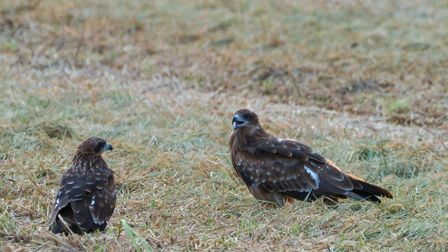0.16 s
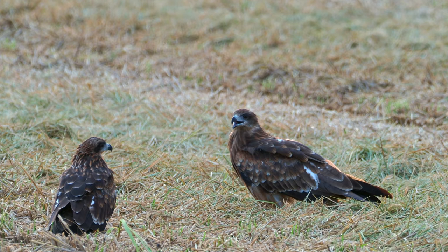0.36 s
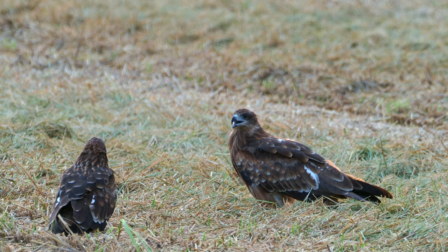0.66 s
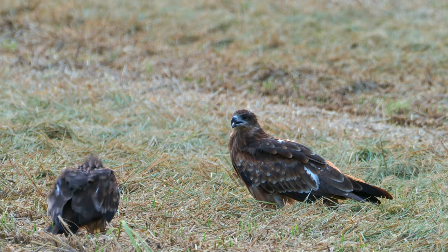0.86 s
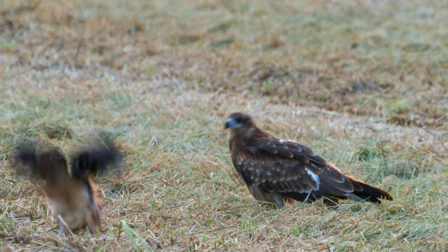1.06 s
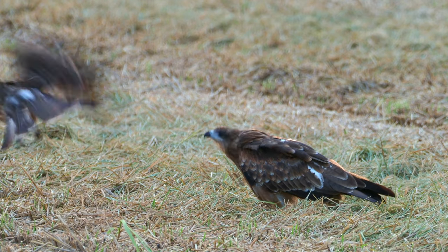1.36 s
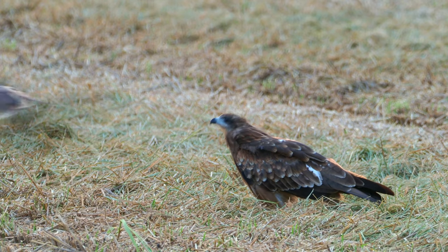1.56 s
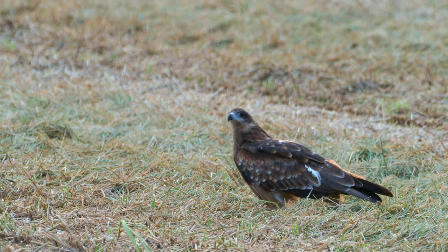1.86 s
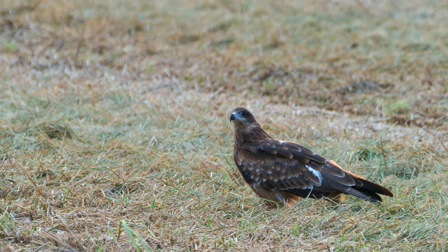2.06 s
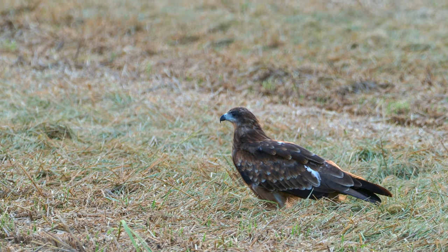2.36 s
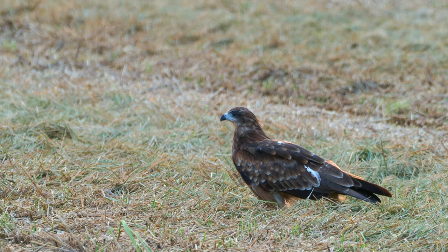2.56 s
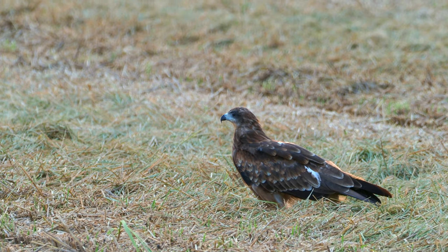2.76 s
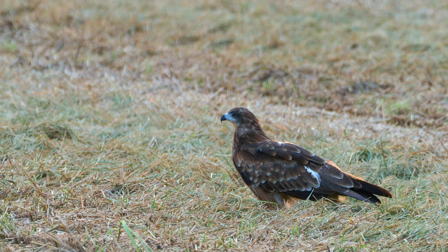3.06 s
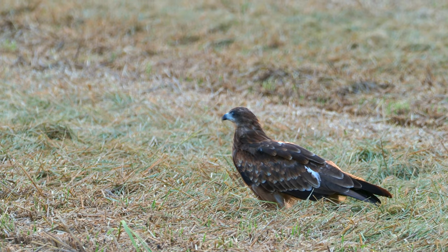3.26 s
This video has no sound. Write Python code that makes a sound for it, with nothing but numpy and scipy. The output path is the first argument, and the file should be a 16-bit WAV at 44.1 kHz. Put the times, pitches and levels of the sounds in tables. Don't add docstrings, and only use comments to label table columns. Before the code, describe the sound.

One high, hoarse-edged kite whistle sags and quivers above a distant motor's low rumble

```python
import sys
import numpy as np
from scipy import signal
from scipy.fft import rfft, irfft
from scipy.io import wavfile
from scipy.ndimage import uniform_filter1d

SR = 44100
rng = np.random.default_rng(int(sys.argv[2]) if len(sys.argv) > 2 else 0)


def amplitude_ratio(level_db):
    exponent = np.asarray(level_db, float) / 20
    return 10 ** exponent


def master(y):
    cut = np.clip(np.atleast_2d(y).T, -1, 1)
    pcm = np.round(cut * 32767)
    wavfile.write(sys.argv[1], SR, pcm.astype(np.int16))


N = 150822
FIELD_LAG_SAMPLES = 4


def rms_one(x):
    return x / np.sqrt(np.mean(x ** 2) + 1e-20)


def in_time(rows):
    s, *columns = np.transpose(rows)
    return [np.interp(np.arange(N) / SR, s, c) for c in columns]


def at_hz(points, hz):
    p = np.array(points, float)
    return np.interp(np.log(hz + 1), np.log(p[:, 0] + 1), p[:, 1])


def drift(rate):
    step = 40
    r = np.exp(-2 * step * np.pi * rate / SR)
    kicks = rng.standard_normal(N // step + 2002)
    slow = signal.lfilter([1], [1, -2 * r, r * r], kicks)[2000:]
    slow = rms_one(slow - slow.mean())
    return np.interp(np.arange(N) / step, np.arange(len(slow)), slow)


def resonance(x, hz, width_hz):
    r = np.exp(-np.pi * width_hz / SR)
    ringing = [1, -2 * r * np.cos(2 * np.pi * hz / SR), r * r]
    return signal.lfilter([(1 - r * r) / 2, 0, (r * r - 1) / 2], ringing, x)


def pair(mid, side, alike, lag):
    hz = np.fft.rfftfreq(N, 1 / SR)
    alike = np.clip(alike, 0, 1)
    late = np.exp(-1j * np.pi * hz * lag / SR)
    shared = np.sqrt(1 + alike) * mid
    unshared = np.sqrt(1 - alike) * side
    return irfft(np.array([(shared + unshared) * late, (shared - unshared) / late]), N)


def tilted(x, balance, top_hz):
    hz = np.fft.rfftfreq(N, 1 / SR)
    tilt = at_hz(balance, hz) / 2
    return irfft(rfft(x) * amplitude_ratio(np.array([tilt, -tilt])) * (hz < top_hz), N)


# (frequency [Hz], likeness [0 to 1])
PORT_LIKENESS = [(30, .985), (150, 0.88), (330, 0.72), (700, 0.82), (1300, 0.55), (2400, 0.29),
                 (5000, 0.0075)]


def field_noise(colour):
    hz = np.fft.rfftfreq(N, 1 / SR)
    inside = (hz > colour[0][0]) * (hz < colour[-1][0])
    mid, side = rfft(rng.standard_normal((2, N))) * amplitude_ratio(at_hz(colour, hz)) * inside
    return rms_one(pair(mid, side, at_hz(PORT_LIKENESS, hz), FIELD_LAG_SAMPLES))


# (frequency [Hz], density [dB per Hz])
HISS_COLOUR = [(1500, 1.5), (1850, -4.5), (2900, 0), (3900, -2.5), (4400, -7.5), (5700, -6.5), (7200, -9),
               (9300, -11.5)]
HISS_DB = -71
# (frequency [Hz], density [dB per Hz])
TOP_HISS_COLOUR = [(9300, 1), (10300, 3), (11200, -4), (13300, 2.5), (14300, -1), (15300, 0.5), (16500, 1)]
TOP_HISS_DB = -76.5


def port_hiss():
    main = amplitude_ratio(HISS_DB + 2.5) * field_noise(HISS_COLOUR)
    return main + amplitude_ratio(TOP_HISS_DB + 2) * field_noise(TOP_HISS_COLOUR)


# (frequency [Hz], density [dB per Hz])
FIELD_COLOUR = [(200, -22), (240, 0.5), (500, -8), (780, -6.5), (900, -14), (1050, -11), (1500, -12),
                (1800, -35)]
FIELD_DB, FIELD_SWELL_DB = -62.5, .4


def open_field():
    return amplitude_ratio(FIELD_DB + FIELD_SWELL_DB * drift(1.3)) * field_noise(FIELD_COLOUR)


# (frequency [Hz], width [Hz], level [dB])
NARROW_BANDS = [
    (6180, 140, -83.5),
    (6460, 6.9, -115),
]


def narrow_bands():
    out = 0
    for hz, width_hz, db in NARROW_BANDS:
        once = resonance(rng.standard_normal((2, N)), hz, width_hz)
        out = out + amplitude_ratio(db) * rms_one(resonance(once, hz, width_hz))
    return out


# (time [s], level [dB])
RUMBLE_LEVEL = [(0.0, -55.5), (0.3, -47.5), (0.48, -50), (2.12, -51.5), (2.15, -55), (3.39, -52.5),
                (3.42, -49)]
# (frequency [Hz], density [dB per Hz])
RUMBLE_COLOUR = [(6, -12), (14, 6), (27, 5), (40, -3.5), (70, -4.5), (120, -14.5), (190, -11.5)]


def rumble():
    db, = in_time(RUMBLE_LEVEL)
    return amplitude_ratio(db + 1) * field_noise(RUMBLE_COLOUR + [(240, -22)])


# (time [s], level [dB])
RUSTLE_LEVEL = [(0.0, -69), (0.308, -73.5), (0.49, -82.5), (0.718, -88), (0.734, -97), (0.742, -82),
                (0.75, -91)]
# (frequency [Hz], density [dB per Hz])
RUSTLE_COLOUR = [(300, 8.5), (3000, 3), (5000, 4), (7400, 6.5), (8600, 0), (10200, 3), (11400, -4),
                 (13500, 3)]
# (frequency [Hz], left minus right [dB])
RUSTLE_BALANCE = [(3000, -2.5), (8000, 2), (11000, 6), (14000, -11)]
RUSTLE_DB = 11


def rustle():
    db, = in_time(RUSTLE_LEVEL + [(RUSTLE_LEVEL[-1][0] + .3, -100)])
    air = field_noise(RUSTLE_COLOUR + [(16000, -2.2)])
    return amplitude_ratio(db + RUSTLE_DB) * tilted(air, RUSTLE_BALANCE, SR / 2)


# (time [s], tone at eight times shaft speed [Hz], level of that tone [dB], load [dB])
ENGINE_COURSE = [(0, 224.6, -64, -65.5), (.25, 224.2, -60, -59), (.66, 218.5, -62, -57.5),
                 (1.07, 211, -58, -56.5), (1.45, 206.5, -59, -56.5), (1.74, 203.2, -55.5, -58),
                 (1.92, 203.2, -58, -64), (2.72, 207.8, -58.5, -65.5), (3.06, 211, -52.5, -66.5),
                 (3.42, 213.5, -57, -74)]
# (multiple of shaft speed, level [dB], share of the load swing, phase wander [radians])
ENGINE_ORDERS = [(1, -60, .3, 1.2), (2, -58, .3, .9), (3, -59, .9, .8), (4, -65, .1, .6),
                 (6, -59, 1.3, .35), (7, -65, 1.1, .8)]
ENGINE_WOBBLE_DB, LOW_WOBBLE_DB, LOAD_REF_DB = 1.3, 2.2, -58


def engine():
    hz, db, load_db = in_time(ENGINE_COURSE)
    shaft = 2 * np.pi * np.cumsum(uniform_filter1d(hz, size=4000)) / SR / 8
    out = amplitude_ratio(db + ENGINE_WOBBLE_DB * drift(5)) * np.sin(8 * shaft)
    for order, level_db, share, wander in ENGINE_ORDERS:
        order_db = level_db + share * (load_db - LOAD_REF_DB) + LOW_WOBBLE_DB * drift(5)
        phase = round(order) * shaft + wander * drift(4.6) + rng.uniform(0, 2 * np.pi)
        out += amplitude_ratio(order_db) * np.sin(phase)
    return np.sqrt(2) * out


# (time [s], pitch [Hz], level of the second partial [dB])
WHISTLE_COURSE = [(0, 1935, -64), (.05, 1948, -58.5), (.13, 1951, -57), (.26, 1928, -59.5),
                  (.47, 1858, -60.5), (.64, 1904, -62), (.86, 1894, -62), (1.035, 1886, -66),
                  (1.17, 1762, -88)]
# (time [s], drop in pitch [Hz], climb back [s])
TRILL_DIPS = [
    (.687, 62, .034),
    (.758, 50, .03),
    (.83, 22, .022),
    (.894, 108, .032),
    (.972, 106, .031),
]
DROP_S, DIP_SQUARENESS = .018, 2.2
SCOOP_HZ, SCOOP_S = 175, .037


def pitch():
    t = np.arange(N) / SR
    hz = uniform_filter1d(in_time(WHISTLE_COURSE)[0], size=900)
    for s, depth_hz, climb_s in TRILL_DIPS:
        spread = np.where(t < s, DROP_S, climb_s)
        hz = hz - depth_hz * np.exp(-np.abs((t - s) / spread) ** DIP_SQUARENESS)
    return hz - SCOOP_HZ * np.exp(-t / SCOOP_S)


# (time [s], level [dB])
RASP_LEVEL = [(0.0, -60), (0.258, -54.5), (0.51, -64.5), (0.52, -62.5), (0.66, -62.5), (0.812, -80),
              (0.82, -82)]
# (frequency [Hz], width [Hz], level [dB], extra fade [dB per s])
THROAT = [(747, 270, -10.5, -2.5), (1247, 110, -4.5, 5), (1443, 78, 0, 2), (2483, 84, -5, 8),
          (2770, 320, -9.5, 11), (3300, 230, -10.5, 18)]
RASP_FLICKER_DB, RASP_PULSES_PER_S, RASP_PULSE_DEPTH = 1.1, 120, .8
QUARTER_LINE_DB, QUARTER_JITTER = -6, .75


def rasp():
    t = np.arange(N) / SR
    pulse_hz = RASP_PULSES_PER_S * (1 + .25 * drift(31.56))
    throb = 1 + RASP_PULSE_DEPTH * np.sin(2 * np.pi * np.cumsum(pulse_hz) / SR)
    air = rng.standard_normal(N) * throb
    breath = 0
    for k, (hz, width_hz, db, fade_db) in enumerate(THROAT):
        breath = breath + (-1) ** k * amplitude_ratio(db - fade_db * t) * resonance(air, hz, width_hz)
    db, = in_time(RASP_LEVEL + [(1.3, -100)])
    line_phase = 3 * np.pi / 2 * np.cumsum(pitch()) / SR + QUARTER_JITTER * drift(35)
    line = np.sin(line_phase) * throb
    return amplitude_ratio(db + RASP_FLICKER_DB * drift(10)) * (amplitude_ratio(18.5) * breath + amplitude_ratio(QUARTER_LINE_DB) * line)


# (multiple of pitch, level at mean effort [dB], gain per 100 Hz of flat pitch [dB], effort share)
PARTIALS = [(1, -69.5, -2.5, .35), (2, -61, 1.5, 1), (3, -77, -15, .3), (4, -82.5, -4, .6)]
# (multiple of pitch, level [dB])
HALF_LINES = [(.5, -13.5), (1.5, -2.5), (2.5, -18.5), (3.5, -33)]
# (time [s], level [dB])
DOUBLING = [(0, -14), (.03, -6), (.065, -2), (.1, -8), (.15, 0), (.225, -3), (.27, -13), (.32, -30)]
OPEN_PITCH_HZ, MEAN_EFFORT_DB, SHIMMER_DB = 1885, -61, .3
WAVER_HZ, WAVER_RATE = 3.0, 25
HALF_SHIMMER_DB, HALF_JITTER = 2.2, .6


def whistle():
    t = np.arange(N) / SR
    db = in_time(WHISTLE_COURSE)[1]
    hz = pitch() + WAVER_HZ * drift(WAVER_RATE)
    phase = 2 * np.pi * np.cumsum(hz) / SR
    flat = np.maximum(OPEN_PITCH_HZ - hz, 0) / 100
    out = np.zeros(N)
    for k, level_db, flat_db, share in PARTIALS:
        partial_db = level_db + flat_db * flat + share * (db - MEAN_EFFORT_DB) + SHIMMER_DB * drift(30)
        out += amplitude_ratio(partial_db) * np.sin(round(k) * phase)
    half = np.zeros(N)
    for k, level_db in HALF_LINES:
        strength = amplitude_ratio(level_db + HALF_SHIMMER_DB * drift(27))
        half += strength * np.sin(round(2 * k) / 2 * phase + HALF_JITTER * drift(25))
    half_db, = in_time(DOUBLING)
    out += amplitude_ratio(db + half_db) * (t < DOUBLING[-1][0]) * half
    return np.sqrt(2) * out * np.clip((WHISTLE_COURSE[-1][0] - t) / .02, 0, 1)


BIRD_LAG_SAMPLES, BIRD_PAN_DB = 1.06, -2


def scene():
    out = port_hiss() + open_field() + narrow_bands() + rumble() + rustle()
    out += pair(rfft(engine()), 0, 0.91, FIELD_LAG_SAMPLES) / np.sqrt(2)
    out += pair(rfft(rasp()), 0, 1, BIRD_LAG_SAMPLES) / np.sqrt(2)
    pan = amplitude_ratio(np.array([[.5], [-.5]]) * BIRD_PAN_DB)
    return out + pair(rfft(whistle()), 0, 1, BIRD_LAG_SAMPLES) / np.sqrt(2) * pan


# (frequency [Hz], left minus right [dB])
PORT_BALANCE = [(60, -0.5), (150, -2), (380, -3), (950, -1.0), (2380, -1), (5980, -2.5), (15000, 0.5)]


def top_cut(x):
    return signal.sosfilt(signal.butter(12, 15670, fs=SR, output="sos"), x)


def record(dry):
    mix = tilted(dry, PORT_BALANCE, 15690)
    return top_cut(mix)


dry = scene()
out = record(dry)
master(out)
```